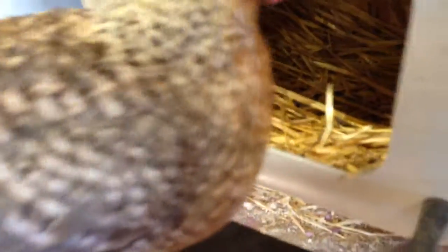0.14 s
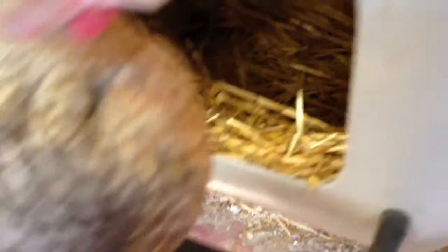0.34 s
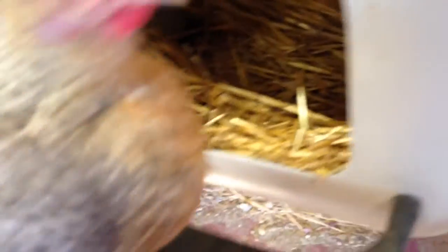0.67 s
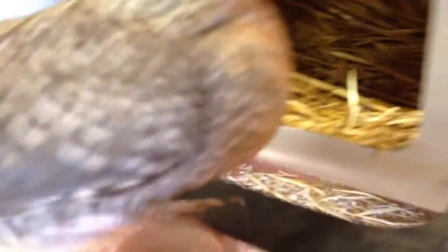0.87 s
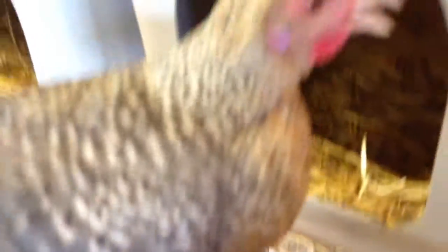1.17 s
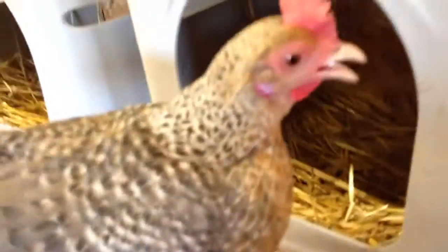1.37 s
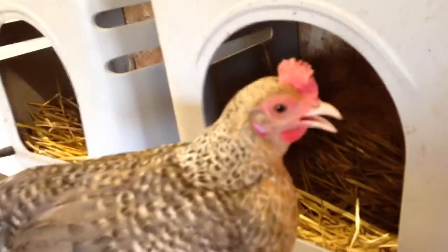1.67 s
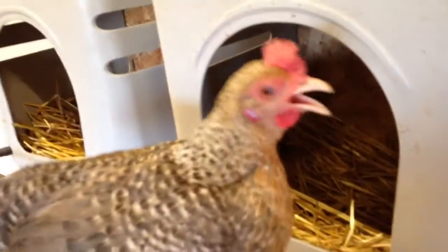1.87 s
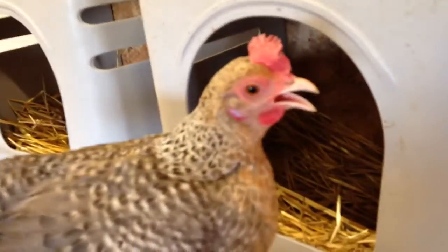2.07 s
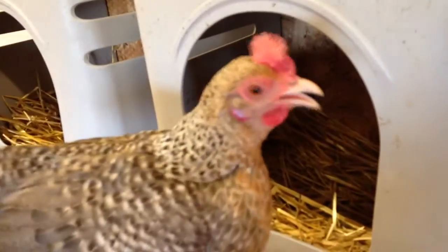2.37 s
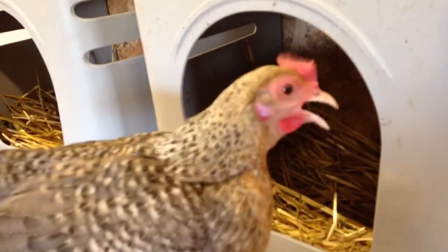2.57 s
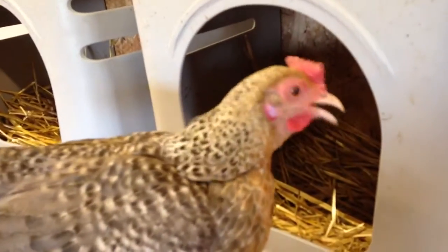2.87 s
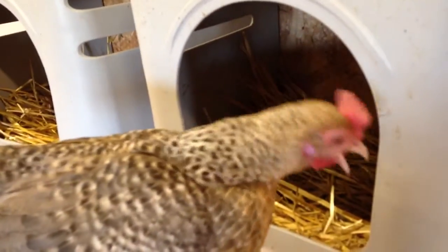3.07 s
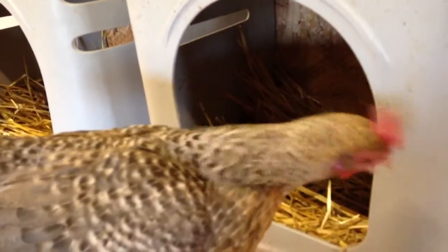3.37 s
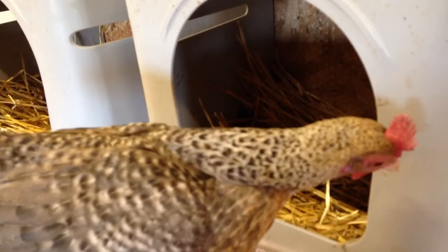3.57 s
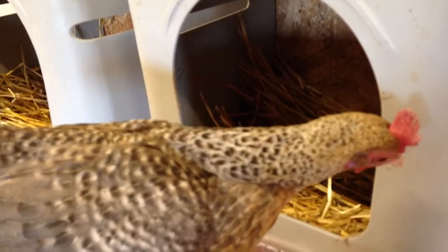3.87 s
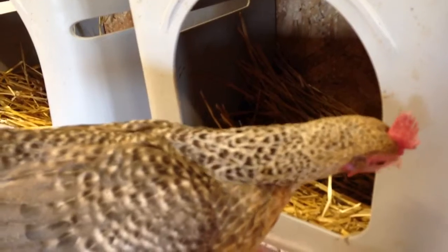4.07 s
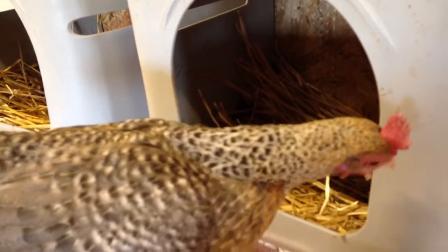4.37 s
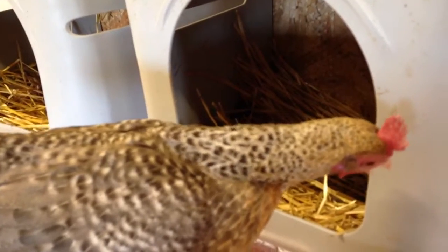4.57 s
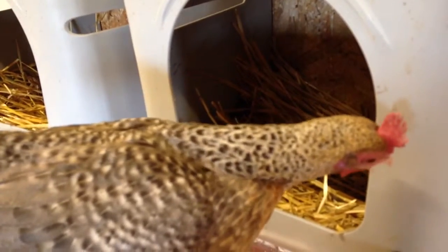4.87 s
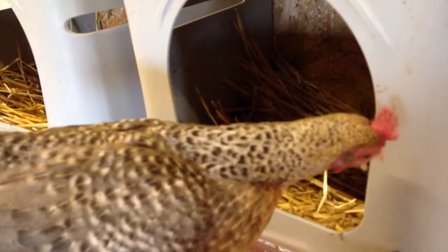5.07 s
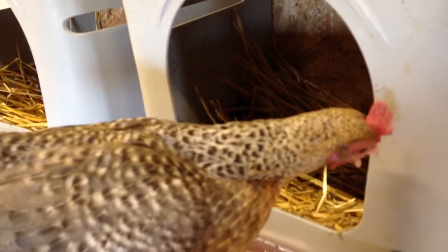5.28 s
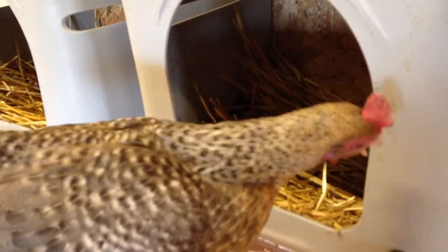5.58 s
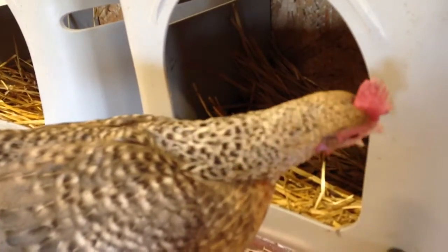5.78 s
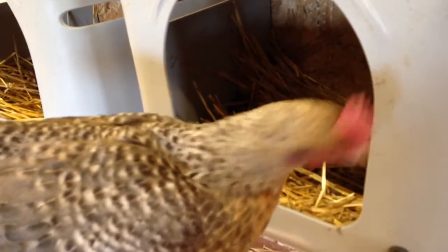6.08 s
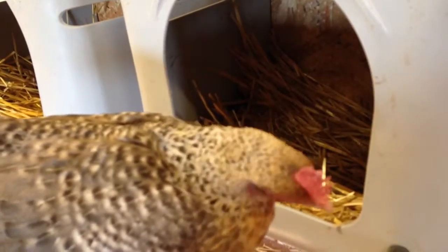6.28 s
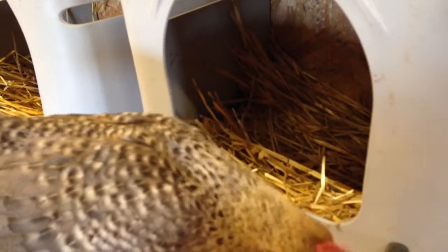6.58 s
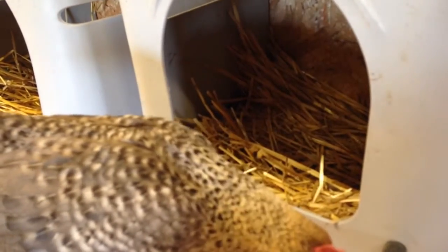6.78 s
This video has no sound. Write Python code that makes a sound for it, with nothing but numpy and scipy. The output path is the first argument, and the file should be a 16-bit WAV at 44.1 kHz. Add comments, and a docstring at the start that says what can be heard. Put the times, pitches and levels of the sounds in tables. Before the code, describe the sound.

Very close to the microphone, a hen starts with soft clucks and dry ticks, then a rough squawk swelling for about a second. Short, bright, nasal cackles follow, some raspy, others clear. After a pause with tiny clucks and a mutter, a harsher squawk opens a second bout of four evenly spaced calls. It ends in faint clucks over low rumble and light hiss, with the short ring of a small coop.

```python
"""Hen cackling in a nest box

A hen cackles close by at a plastic nest box: a long hoarse squawk, then short piercing calls that slip
between clean tone, doubled periods and rasp. The tone is a stack of harmonics; the rasp is ragged beats
ringing throat resonances. Soft clucks (gliding partials), low mutters (uneven beats) and dry ticks
(noise snaps) join in over shaped-noise rumble and hiss; random taps give the coop's short ring."""
import sys
import numpy as np
from scipy import signal
from scipy.fft import rfft, irfft
from scipy.io import wavfile
from scipy.ndimage import uniform_filter1d, minimum_filter1d

SR = 44100
rng = np.random.default_rng(int(sys.argv[2]) if len(sys.argv) > 2 else 0)


def transcribe(u):
    """Save the signal u as a 16-bit wav file named by the first command-line argument.

    u: samples, shape (n,) or (channels, n), limited to [-1, 1]; the rate is SR.
    q: integer samples, one column per channel.
    """
    v = np.clip(np.atleast_2d(u).T, -1, 1)
    q = np.round(v * 32767).astype(np.int16)
    wavfile.write(sys.argv[1], SR, q)


N = 306054  # length of the scene [samples]

# slow rise and fall of the rumble: (time [s], level [dB])
RUMBLE_LEVEL = [(0.0, -68), (0.99, -57.5), (1.08, -68.5), (6.05, -74.5), (6.94, -68.5)]
# colour of the rumble: (frequency [Hz], relative level [dB])
RUMBLE_COLOUR = [(12, -57), (20, -35.5), (41, -6.5), (59, 2), (115, -4), (156, -8.5), (187, -11.5),
                 (200, -22), (260, -37.5), (440, -120)]
# colour of the hiss: (frequency [Hz], relative level [dB])
HISS_COLOUR = [(120, -34.5), (200, -7.5), (619, -22), (2140, -15.5), (2430, -25), (2660, -17.5),
               (15600, -21)]
# how fast the coop's ring dies: (frequency [Hz], time to fall by 60 dB [s])
COOP_DECAY = [(300, 0.26), (2000, 0.13), (4000, 0.14), (8000, 0.12), (15000, 0.03)]
# dry ticks of beak, claw and straw: (time [s], level before the fade [dB])
TICKS = [(0.243, -39), (0.353, -30), (1.684, -47), (6.569, -59.5), (6.663, -60)]
# low hoarse mutters, one level curve each: (time [s], level [dB])
MUTTERS = [
    [(3.59, -65.5), (3.756, -58.5), (3.81, -73.5)],
    [(3.89, -69), (4.02, -50.5), (4.03, -32)],
]
# colour of the mutters, also used for stirred straw: (frequency [Hz], relative level [dB])
MUTTER_COLOUR = [(120, -48.5), (200, -13), (393, -14), (563, -17.5), (926, -20), (1460, -27), (1600, -33),
                 (2500, -34.5), (3250, -55), (5500, -120)]
# soft clucks: (time [s], level of the lowest partial [dB], middle pitch [Hz], half of the length [s])
CLUCKS = [(.03, -54.5, 400, 0.04), (.11, -45.5, 230, 0.027), (0.396, -40.5, 233, 0.018),
          (2.42, -54.5, 223, .037), (2.922, -49, 222, 0.032), (3.495, -48.5, 234, .027),
          (5.027, -52, 224, 0.021), (5.534, -53.5, 246, 0.031), (5.964, -52.5, 215, .015),
          (6.293, -52, 422, 0.039), (6.304, -51, 246, 0.035), (6.411, -42.5, 819, 0.037),
          (6.768, -47.5, 717, 0.023), (6.882, -58, 463, .073), (6.918, -46, 733, 0.023)]
# colour of the clean tone through windpipe and beak: (frequency [Hz], relative level [dB])
TONE_COLOUR = [(450, -22.5), (950, -11), (1400, -3), (2000, 1), (2900, -13), (3900, -11.5), (4800, -10),
               (6000, -23.5), (6900, -16), (7900, -34.5), (8800, -23.5), (11000, -27), (13000, -33),
               (15500, -39)]
# throat rings above the lowest one: (base frequency [Hz], width setting [Hz], relative level [dB])
THROAT_RINGS = [(1981, 585, 4), (2850, 1300, -16.5), (3762, 410, -10), (4860, 1300, -8.5),
                (6620, 1100, -14.5), (9800, 1200, -19), (13200, 1600, -24.5)]
# start and end of the hen turning her head away: (time [s], time [s])
HEAD_TURN = 2.8, 3.6
# how the turned head recolours the voice: (frequency [Hz], change [dB])
TURNED_COLOUR = [(1000, -6), (2000, 0.5), (3000, -7), (4000, -0.5), (5000, -7), (6000, -4.5), (7000, 1),
                 (8000, -5.5), (9500, -7), (11500, -6), (15000, -7.5)]
# brief surges and catches of breath in the hoarse calls: (time [s], change [dB])
SURGES = [(.25, -41), (.274, 11.5), (.575, 3), (.633, 6.5), (.668, -12.5), (.695, 7), (.754, 5.5),
          (.804, 7), (.89, 8), (.926, -1.5), (.952, 10), (.986, 4), (1.066, 4), (1.103, 7), (4.045, 7),
          (4.07, -16.5)]
# the voice flicks upward and back: (time [s], rise [share of pitch])
FLICKS = [(1.79, 0.027), (1.855, 0.014), (4.83, 0.019), (4.86, 0.03), (5.3, 0.045), (5.36, 0.054),
          (5.765, 0.023), (5.82, 0.058), (5.852, 0.048)]
# pitched notes inside the calls: (start [s], end [s], first pitch [Hz], time of top [s], top pitch [Hz],
# pitch before the fall [Hz], fall [share of pitch], time for the rasp to clear [s], rasp left [dB],
# level of the doubled-period lines [dB], doubled until [s])
NOTES = [(0.398, 0.435, 1360, 0.35, 1365, 1353, 0.074, 0.0078, -31, -32, .44),
         (1.15, 1.25, 1381, 1.21, 1395, 1341, 0.044, 0.013, -3, 3, 1.215),
         (1.361, 1.451, 892, 1.47, 918, 912, 0.036, 0.023, -18, -42, 1.45),
         (1.505, 1.564, 1248, 1.51, 1252, 1231, .24, 0.011, -5, -2.5, 1.565),
         (1.699, 1.825, 892.6, 1.93, 916, 926, .001, 0.028, -23, -14.5, 1.75),
         (1.828, 1.96, 925.5, 1.89, 961, 965, .064, 0.023, -31.5, -18, 1.84),
         (2.086, 2.283, 952, 2.19, 965.6, 969, .095, 0.011, -51, -51, 2.1),
         (2.461, 2.745, 879, 2.645, 1000, 993.5, .12, .065, -41.5, -9.5, 2.56),
         (2.957, 3.362, 905, 3.217, 1038, 1018, 0.12, 0.055, -49.5, -10, 3.08),
         (4.257, 4.49, 1010, 4.43, 1053, 1020, .1, 0.076, -54.5, -8, 4.315),
         (4.665, 4.901, 980, 4.87, 1034, 1019, 0.098, .017, -48.5, -42, 3.9),
         (5.106, 5.388, 966.5, 5.28, 1045, 1029, 0.097, 0.038, -41, -41, 5.2),
         (5.602, 5.897, 950, 5.78, 1032, 1038, 0.14, 0.091, -44.5, -8, 5.67)]
# hoarse squawks, one effort curve each: (time [s], effort [dB], treble [dB])
SQUAWKS = [
    [(.24, -45.5, 13), (.348, -34.5, -18), (.44, -29.5, -20), (.52, -26, -8.5), (.652, -20.5, -3.5),
     (.71, -20.5, -3), (1.224, -15.5, -1), (1.238, -17, -6.5), (1.27, -55, -5)],
    [(1.35, -21, -3), (1.363, -14.5, -1), (1.545, -16.5, 1.6), (1.585, -54.5, -10)],
    [(4.02, -46, -4), (4.034, -30, -1), (4.12, -20, 1.5), (4.22, -12, 5.5), (4.436, -9, -0.5),
     (4.5, -21.5, 2.5), (4.53, -51, 5)],
]
# how each squawk rasps: (time [s], typical beat rate [Hz], raggedness [0 to 1],
# lowest throat ring [Hz], relative level of that ring [dB])
SQUAWK_RASP = [
    [(.27, 810, 0.47, 810, 32), (.315, 1225, .63, 1350, 23), (.375, 900, 0.93, 870, 10.5),
     (.45, 975, 0.85, 1000, 6.5), (1.1, 1328, 0.66, 1334, -2.5), (1.26, 1191, 0.56, 1240, -1.7)],
    [(1.46, 633, 0.94, 1290, 3), (1.52, 600, 0.15, 1270, -1.5), (1.555, 490, 0.8, 1110, 1.5)],
    [(4.025, 418, 0.13, 885, 5), (4.062, 767, .23, 1376, 10.5), (4.09, 498.2, 0.73, 1000, 7.5),
     (4.18, 430, 0.74, 1005, 1.3), (4.22, 415, .61, 1435, 4), (4.3, 529, 0.48, 1440, 0.5)],
]
# the rasp at the edges of a cackle: (typical beat rate [Hz], raggedness [0 to 1],
# lowest throat ring [Hz], relative level of that ring [dB])
CACKLE_RASP = 900, 0.52, 1319, 0.06
# piercing cackles: (start [s], end [s], release [s], effort after the attack [dB],
# effort before the release [dB], treble after the attack [dB], treble before the release [dB])
CACKLES = [(1.693, 1.984, .03, -16, -12.5, 0, 6.5), (2.078, 2.292, 0.033, -11.5, -11, 4, 5.8),
           (2.451, 2.76, 0.031, -14.5, -12, 0.7, 8), (2.955, 3.373, 0.041, -13.5, -10.5, 0.6, 7.2),
           (4.655, 4.924, 0.069, -12.5, -9, 0, 1.8), (5.101, 5.404, 0.039, -11.5, -10.5, 0.7, 0.11),
           (5.594, 5.908, .055, -13.5, -9.5, 0, 5.1)]

EDGE_HZ = 15700  # no partials and no sound above this
HISS_DB, COOP_DB = -70, -21.5
# a cluck's pitch rises a little; each partial is weaker, more so in high clucks
CLUCK_GLIDE, PARTIAL_DB_PER_KHZ = .03, -15
# the shape of a cackle, with a faint scrape (LEAD) before the attack
LEAD_S, LEAD_DB, ATTACK_S, ATTACK_DB, ARCH_DB = .012, -14.5, 0.0099, -23.5, 1
RELEASE_DB, DYING_S, DYING_DB, SHUT_BEAK_DB = -11.5, .022, -26.5, -6
# how a note clears, falls, cracks back into rasp and loses its doubled periods
FALL_S, FALL_POWER, CRACK_S, CLEARING_POWER, UNDOUBLE_S, SINGLE_DB = 0.04, 1.7, 0.021, 2.1, .03, -51


def gain_of(db):
    """Turns dB into amplitude."""
    return 10 ** (np.asarray(db) / 20)


def evened(x):
    """Scales a sound to an average strength (rms) of 1."""
    return x / np.sqrt(np.mean(x ** 2) + 1e-20)


def read(points, hz):
    """Reads a table by frequency, with straight lines on a logarithmic frequency axis."""
    f, value = np.transpose(points)
    return np.interp(np.log(hz + 1), np.log(f + 1), value)


def follow(rows, t):
    """Reads all columns of a curve at the times t."""
    s, *columns = np.transpose(rows)
    return [np.interp(t, s, column) for column in columns]


def bumps(rows, t, rise, fall):
    """Adds up short bell-shaped swells (time, height) with their own rise and fall times [s]."""
    return sum(height * np.exp(-((t - s) / np.where(t < s, rise, fall)) ** 2) for s, height in rows)


def add(mix, s, sound):
    """Lays a sound into the mix at second s."""
    part = mix[round(s * SR):][:len(sound)]
    part += sound[:len(part)]


def drift(shape, hz):
    """Makes a slow random wander of rms 1 by smoothing noise twice; little is left above about hz."""
    wide = max(int(SR / hz / 3), 1)
    smooth = uniform_filter1d(rng.standard_normal(shape), wide)
    return evened(uniform_filter1d(smooth, wide))


def coloured(x, spectrum):
    """Shapes the frequencies of x by a table, then scales it to rms 1."""
    hz = np.fft.rfftfreq(len(x), 1 / SR)
    return evened(irfft(rfft(x) * gain_of(read(spectrum, hz)), len(x)))


def resonate(x, hz, width):
    """Rings x at a moving pitch hz: shift it down to zero, smooth twice and shift back, with gain 1."""
    turn = np.exp(2j * np.pi * np.cumsum(hz * np.ones(len(x))) / SR)
    r = np.exp(-np.pi * width / SR)
    smooth = signal.lfilter([(1 - r) ** 2], [1, -2 * r, r * r], x / turn)
    return 2 * (turn * smooth).real


def background():
    """Shaped noise makes a lumpy rumble, a steady hiss and a brief stirring of straw at the start."""
    t = np.arange(N) / SR
    rumble_noise, hiss_noise, straw_noise = rng.standard_normal((3, N))
    rumble_db = follow(RUMBLE_LEVEL, t)[0] + 2.0 * drift(N, 6.1)
    rumble = gain_of(rumble_db) * coloured(rumble_noise, RUMBLE_COLOUR)
    straw_db = -63 - 20 * np.maximum(t - .3, 0)  # fades by 20 dB a second after 0.3 s
    straw = gain_of(straw_db) * coloured(straw_noise, MUTTER_COLOUR)
    return rumble + straw + gain_of(HISS_DB) * coloured(hiss_noise, HISS_COLOUR)


def coop(x):
    """The walls answer with sparse taps of random sign, each frequency dying at its own speed."""
    taps = np.zeros(SR // 2)
    at = np.arange(200, len(taps) - 20, 20)
    taps[at + rng.integers(0, 20, len(at))] = rng.choice([-1., 1.], len(at))
    hz, t, bands = signal.stft(taps, SR, nperseg=256)
    dying = gain_of(-60 * t / read(COOP_DECAY, hz)[:, None])
    tail = signal.istft(bands * dying, SR, nperseg=256)[1]
    return signal.oaconvolve(x, tail / np.linalg.norm(tail))[:N]


def tick(s, db):
    """A dry snap: a few milliseconds of shaped noise that fades fast."""
    t = np.arange(400) / SR
    snap = coloured(rng.standard_normal(len(t)), [(300, -21), (1300, 19), (15000, -34)])
    return s, gain_of(db - 60 * t / 0.021) * snap  # falls by 60 dB in 21 ms


def mutter(rows):
    """Quick uneven throat beats with the beak shut."""
    t = np.arange(rows[0][0], rows[-1][0], 1 / SR)
    turns = np.cumsum(385 * np.exp(0.15 * drift(len(t), 150))) / SR
    beats = np.diff(np.floor(turns), prepend=0) * rng.uniform(0.42, 1, len(t))  # one click per turn
    sound = gain_of(follow(rows, t)[0]) * coloured(beats, MUTTER_COLOUR)
    return t[0], sound * signal.windows.tukey(len(t), .15)


def cluck(s, db, hz, length):
    """A short soft note of three partials that swells and fades."""
    u = np.arange(0, 2, 1 / SR / length)
    wobble = .012 * drift(len(u), 120)
    turns = np.cumsum(hz * (1 + CLUCK_GLIDE * (u - .5) + wobble)) / SR
    step_db = PARTIAL_DB_PER_KHZ * hz / 1e3  # from one partial to the next
    wave = sum(gain_of(step_db * k) * np.sin(2 * np.pi * (k + 1) * turns) for k in range(3))
    swell = (u / 0.36) ** 2 * np.exp(2 * (1 - u / 0.4))
    return s, gain_of(db) * wave * swell


def treble(hz, bright_db, turned):
    """A wide beak lets the upper bands through, the topmost a little less; a turned head shades them."""
    return bright_db * np.where(hz > 5800, .9, hz > 3300) + turned * read(TURNED_COLOUR, hz)


def voicing(t):
    """Each note clears from rasp, climbs to its top, drifts, then falls and cracks back into rasp."""
    hz, rasp_db, doubled_db = np.ones(len(t)), np.zeros(len(t)), np.zeros(len(t))
    for start, end, first, top_s, top, late, fall, clear_s, left_db, pair_db, pair_s in NOTES:
        on = t >= start
        climb = np.sin(np.pi / 2 * np.clip((t - start) / max(top_s - start, 1e-3), 0, 1)) ** 2
        after = (late - top) * np.clip((t - top_s) / max(end - FALL_S - top_s, 1e-3), 0, 1)
        falling = 1 - fall * np.clip(1 + (t - end) / FALL_S, 0, 1) ** FALL_POWER
        hz[on] = ((first + (top - first) * climb + after) * falling)[on]
        clearing = np.clip((t - start) / clear_s, 0, 1) ** CLEARING_POWER
        cracking = np.clip((end - t) / CRACK_S, 0, 1)
        rasp_db[on] = left_db * np.minimum(clearing, cracking)[on]
        doubled_db[on] = np.interp(t[on], [pair_s, pair_s + UNDOUBLE_S], [pair_db, SINGLE_DB])
    return hz * (1 + bumps(FLICKS, t, 0.0065, 0.01)), rasp_db, doubled_db


def tone(hz, doubled_db, bright_db, turned):
    """Harmonics of the beating membranes; uneven pairs of beats add lines half-way between."""
    hz = hz * (1 + .0045 * drift(len(hz), 50))
    order = np.arange(1, 35)[:, None] / 2  # halves are the doubled-period lines
    db = read(TONE_COLOUR, order * hz) + treble(order * hz, bright_db, turned)
    step = 16  # the waver is drawn once per 16 samples
    waver = drift((len(order), len(hz) // step + 1), 35 * step)
    waver = np.repeat(waver, step, axis=1)[:, :len(hz)]
    db += (1.6 + 0.11 * order) * waver  # each partial wavers, the high ones most
    db += (order % 1 > 0) * (doubled_db + 2.2 * drift(len(hz), 100))
    level = gain_of(db) * (order * hz < EDGE_HZ)
    lag = 0.66 * order ** 2  # the windpipe spreads the partials in phase
    waves = level * np.cos(order * 2 * np.pi * np.cumsum(hz) / SR + lag)
    return waves.sum(0) / np.sqrt((level ** 2).sum(0) / 2)


def rasp(t, rasping, bright_db, turned):
    """The membranes lose their rhythm: ragged beats ring the throat, the upper rings in clumps."""
    rate_hz, ragged, ring_hz, ring_db = follow(rasping, t)
    ragged = np.clip(ragged, 0, 1)
    turns = np.cumsum(rate_hz * np.exp(.3 * ragged * drift(len(t), 400))) / SR
    size_db = 4.6 * ragged * np.minimum(rng.exponential(1, len(t)), 2.4)
    beats = np.diff(np.floor(turns), prepend=0) * gain_of(size_db)
    beats = beats - uniform_filter1d(beats, 150)
    drive = beats / np.sqrt(uniform_filter1d(beats ** 2, 900) + 1e-9)
    drive = drive + .3 * ragged * rng.standard_normal(len(t))  # ragged beats are also breathy
    shared_clumps = 3.5 * drift(len(t), 110)
    own_clumps = 4.4 * drift((len(THROAT_RINGS), len(t)), 60)
    clumped = drive * gain_of(ragged * (shared_clumps + own_clumps))
    stretch = (ring_hz / 1250) ** 0.31  # rings above 4200 Hz climb with the lowest one
    sound = np.zeros(len(t))
    for k, (hz, width, db) in enumerate(THROAT_RINGS):
        ring = resonate(clumped[k], hz * (stretch if hz > 4200 else 1), width)
        sound += (-1) ** k * gain_of(db + treble(hz, bright_db, turned)) * ring
    sound -= gain_of(ring_db) * resonate(drive, ring_hz, 230)
    # a ring at 740 Hz grows with the beat rate
    sound += gain_of(ring_db - 23.5 + rate_hz / 60) * resonate(drive, 740, 450)
    return sound / np.sqrt(uniform_filter1d(sound ** 2, 2600) + 1e-12)


def call(rows, rasping):
    """One breath: tone and rasp share its power; outside the notes all is rasp."""
    t = np.arange(rows[0][0], rows[-1][0], 1 / SR)
    effort_db, bright_db = follow(rows, t)
    effort_db = effort_db + bumps(SURGES, t, .0022, .012)
    hz, rasp_db, doubled_db = voicing(t)
    turned = np.interp(t, HEAD_TURN, [0, 1])
    share = np.clip(gain_of(rasp_db), 0, 1)
    voice = np.sqrt(1 - share ** 2) * tone(hz, doubled_db, bright_db, turned)
    voice += share * rasp(t, rasping, bright_db, turned)
    voice *= gain_of(effort_db) * signal.windows.tukey(len(t), .011 / (t[-1] - t[0]))
    no_bass = signal.butter(4, 300, "high", fs=SR, output="sos")  # a small body radiates no bass
    return t[0], signal.sosfilt(no_bass, voice)


def cackle(start, end, release_s, first_db, last_db, first_treble_db, last_treble_db):
    """Quick attack, arched hold, release and a last dying scrape; the beak is nearly shut at both ends."""
    held, let_go = start + ATTACK_S, end - release_s
    first_shut_db, last_shut_db = first_treble_db + SHUT_BEAK_DB, last_treble_db + SHUT_BEAK_DB
    middle_db = (first_db + last_db) / 2 + ARCH_DB
    effort = [(start - LEAD_S, first_db + ATTACK_DB + LEAD_DB, first_shut_db),
              (start, first_db + ATTACK_DB, first_shut_db),
              (held, first_db, first_treble_db),
              ((held + let_go) / 2, middle_db, (first_treble_db + last_treble_db) / 2),
              (let_go, last_db, last_treble_db),
              (end, last_db + RELEASE_DB, last_shut_db),
              (end + DYING_S, last_db + RELEASE_DB + DYING_DB, last_shut_db)]
    return call(effort, [(start, *CACKLE_RASP)])


def scene():
    """Adds up the background, the ring of the coop and all the sounds of the hen."""
    hen = np.zeros(N)
    for row in TICKS:
        add(hen, *tick(*row))
    for rows in MUTTERS:
        add(hen, *mutter(rows))
    for row in CLUCKS:
        add(hen, *cluck(*row))
    for rows, rasping in zip(SQUAWKS, SQUAWK_RASP):
        add(hen, *call(rows, rasping))
    for row in CACKLES:
        add(hen, *cackle(*row))
    return (background() + gain_of(COOP_DB) * coop(hen) + hen)[None]


def record(dry):
    """A quick limiter holds the peaks; the microphone loses the deepest bass; then the band limit."""
    room_left = np.minimum(.74 / (abs(dry) + 1e-9), 1)
    held = dry * uniform_filter1d(minimum_filter1d(room_left, 161), 161)
    held = signal.lfilter(*signal.butter(2, 40, "high", fs=SR), held)
    band_limit = signal.firwin(511, EDGE_HZ, window=("kaiser", 9), fs=SR)
    return signal.oaconvolve(held, band_limit[None], "same")


dry = scene()
out = record(dry)
transcribe(out)
```